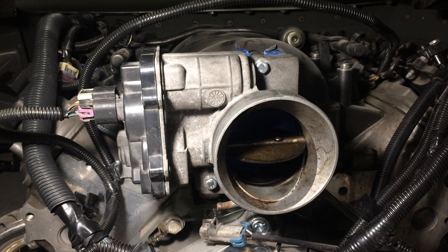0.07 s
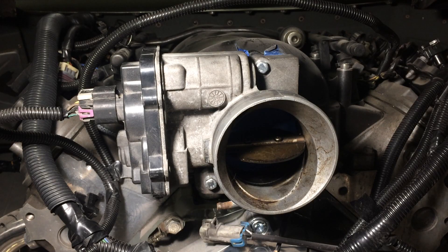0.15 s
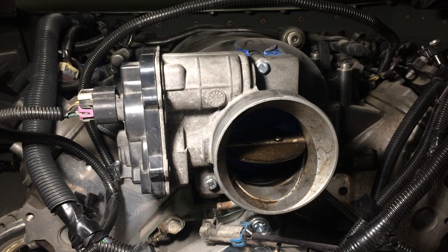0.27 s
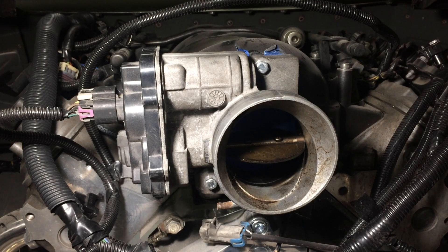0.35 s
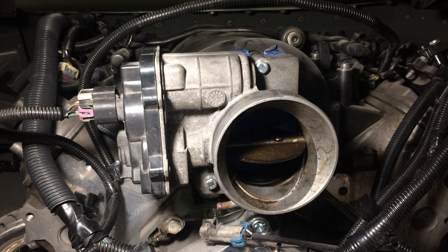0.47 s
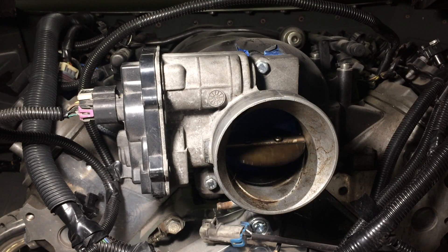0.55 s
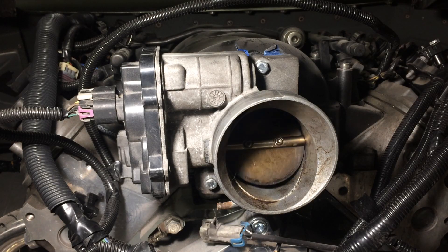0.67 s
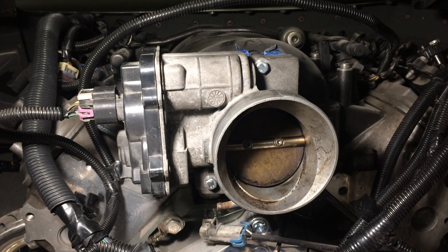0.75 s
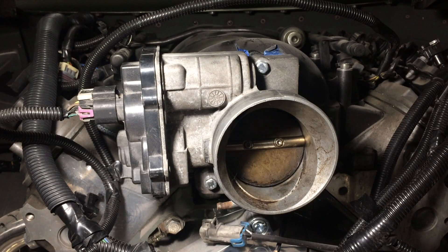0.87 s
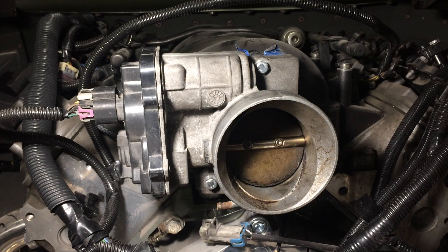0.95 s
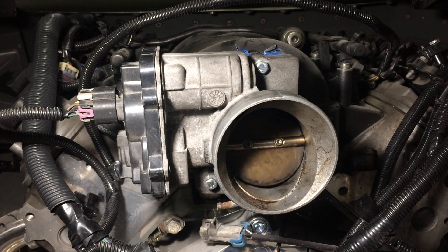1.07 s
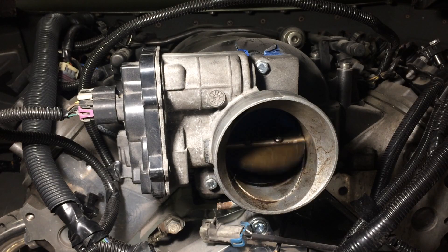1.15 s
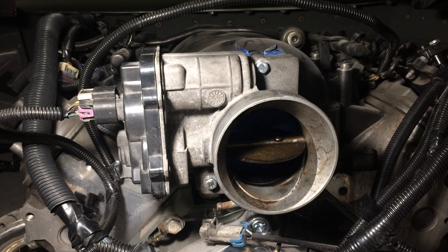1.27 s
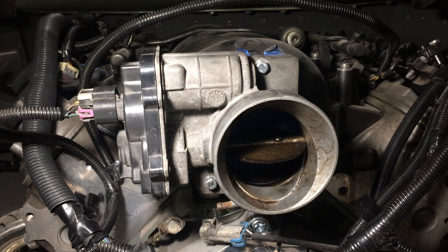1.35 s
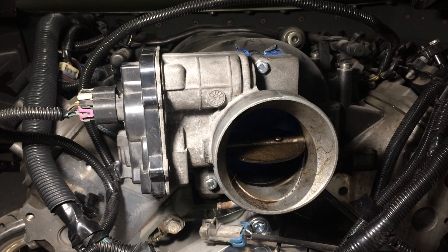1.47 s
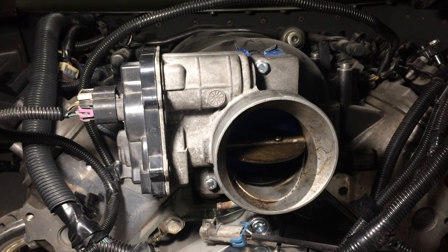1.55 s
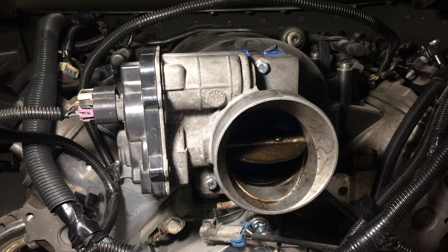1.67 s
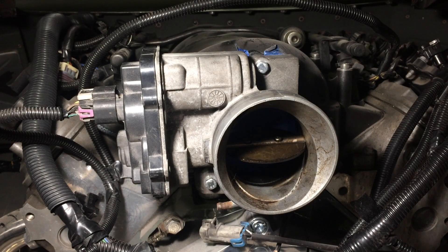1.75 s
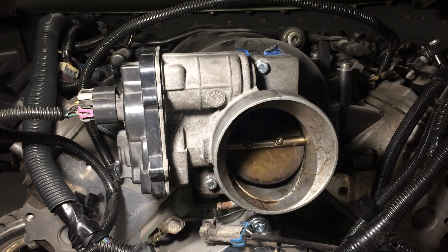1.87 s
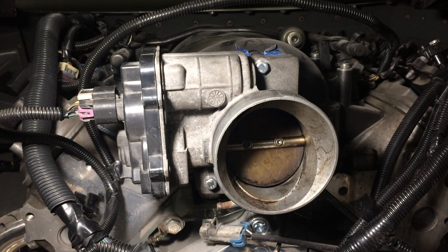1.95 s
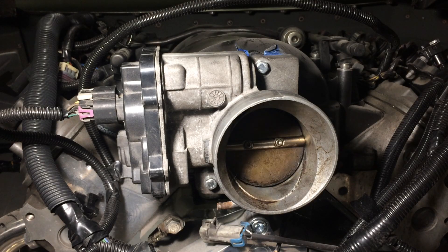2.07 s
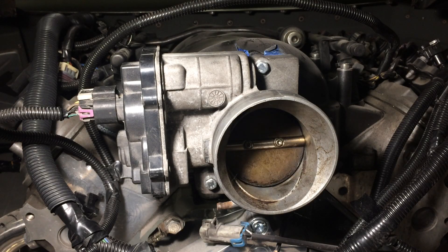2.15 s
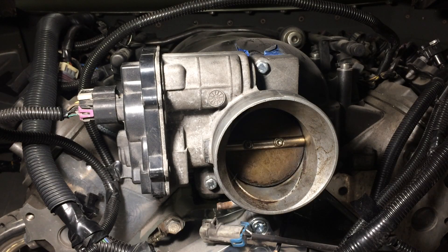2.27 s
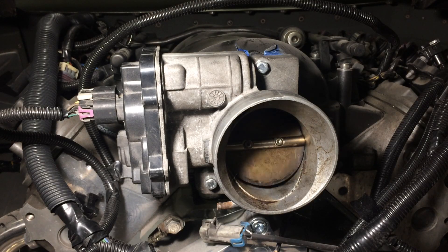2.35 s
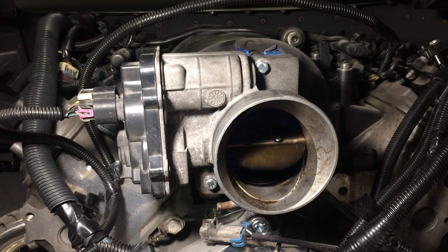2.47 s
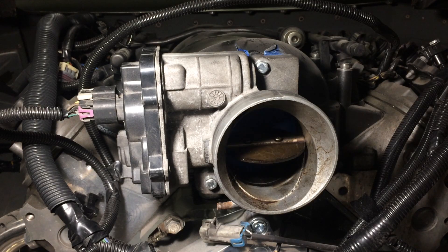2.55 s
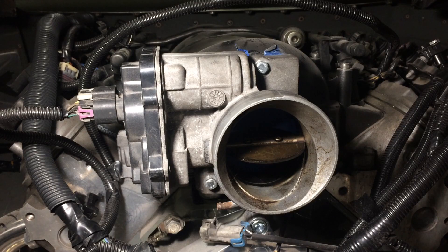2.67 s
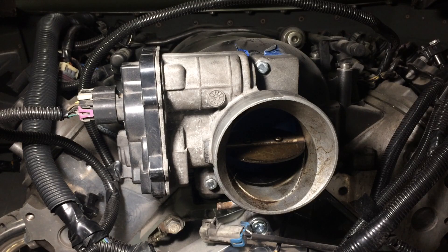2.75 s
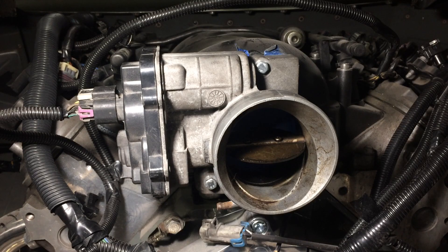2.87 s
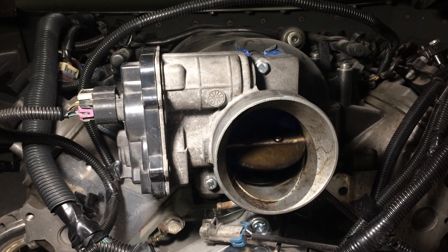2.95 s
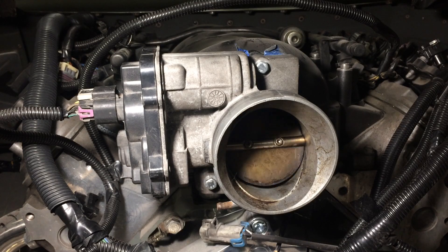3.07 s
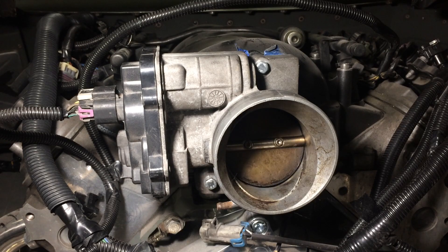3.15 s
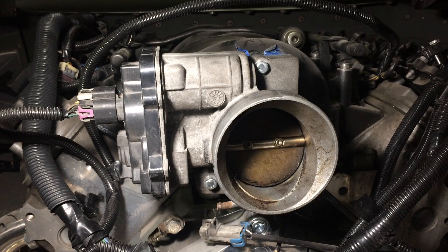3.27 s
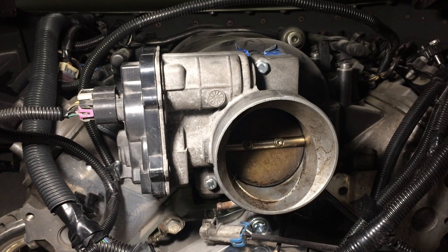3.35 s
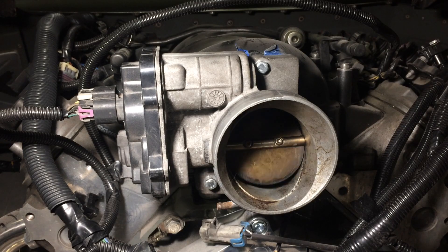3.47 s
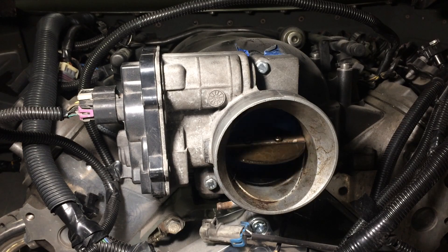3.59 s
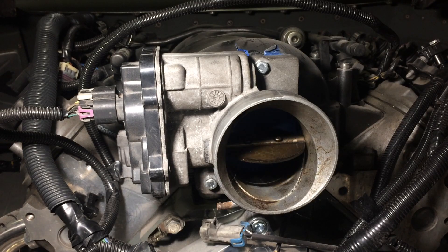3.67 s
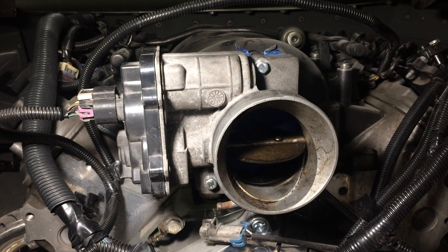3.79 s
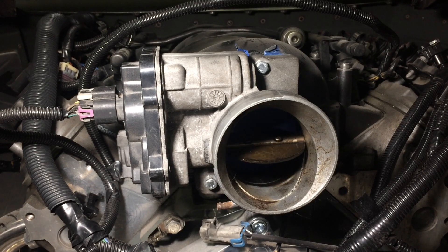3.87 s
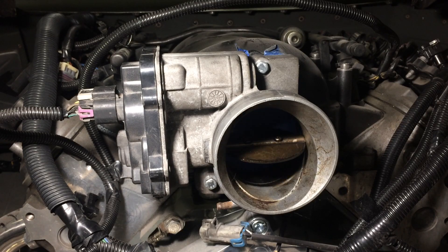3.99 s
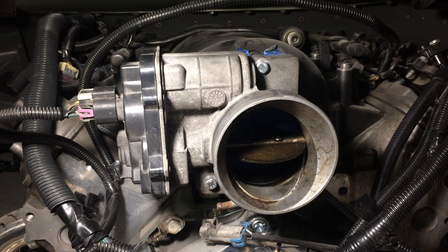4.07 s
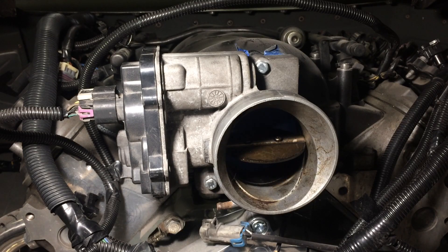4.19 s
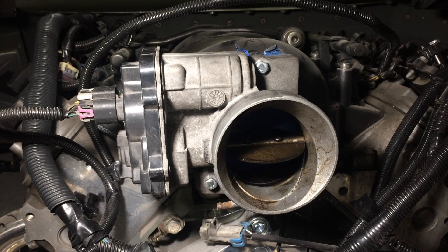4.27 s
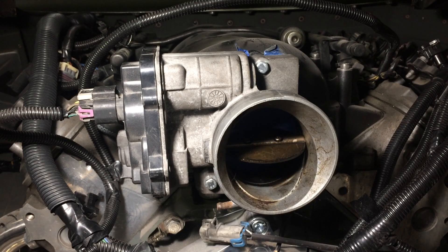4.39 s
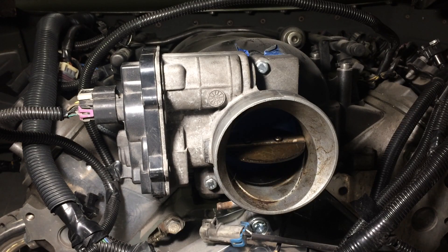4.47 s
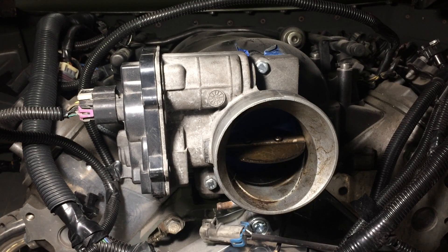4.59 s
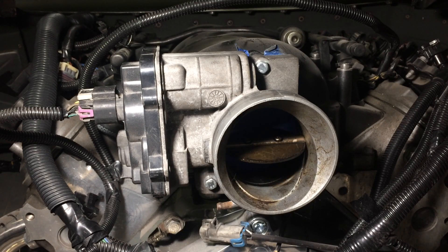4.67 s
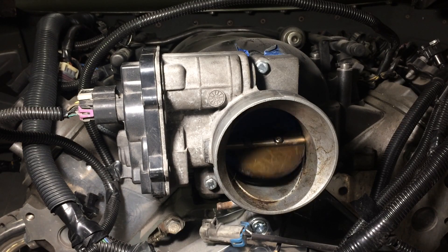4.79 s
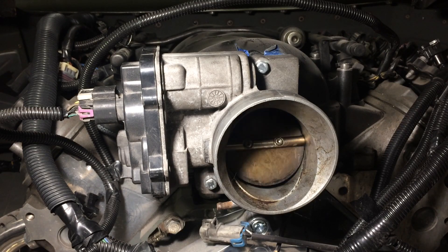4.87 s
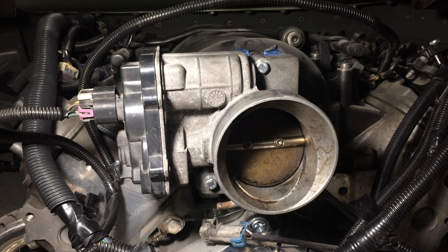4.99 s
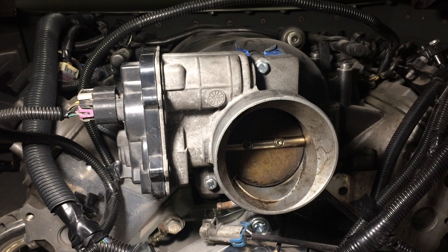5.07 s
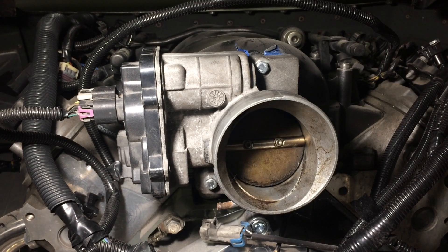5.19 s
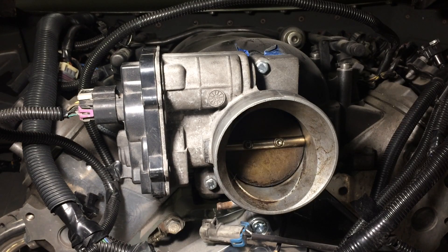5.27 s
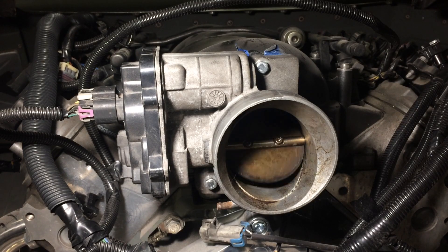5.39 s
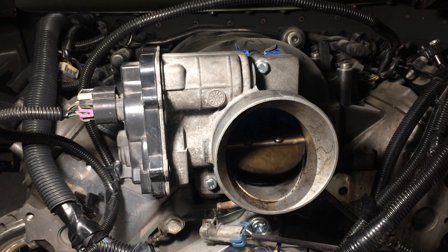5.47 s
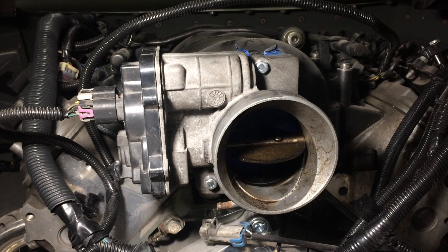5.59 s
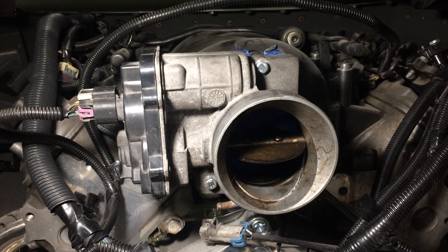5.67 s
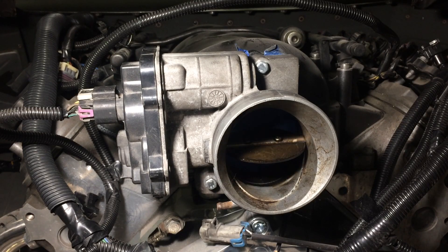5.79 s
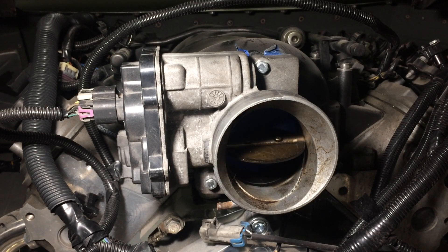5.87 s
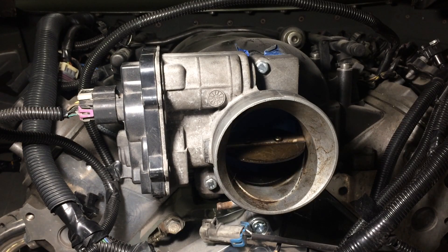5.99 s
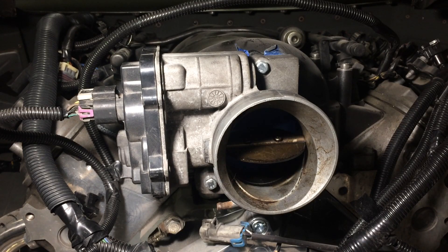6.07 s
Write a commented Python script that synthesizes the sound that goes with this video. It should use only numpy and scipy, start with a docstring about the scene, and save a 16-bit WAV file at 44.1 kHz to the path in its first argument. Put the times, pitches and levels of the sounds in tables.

```python
"""An electronic throttle body is worked open and shut on a stopped engine in a garage, close to a phone.
Its small motor ticks once per gear tooth, faster as it spins up; the looser gears rattle the aluminium
housing and the plate through banks of resonances, and a free gear wheel chatters at top speed.
The motor drive whines as a steady-pitched sine that swells and dips with the load.
The pedal booms and knocks softly in the cabin, and a fan hums in wavering lines over a rush of air."""
import sys
import numpy as np
from scipy import signal
from scipy.fft import rfft, irfft
from scipy.io import wavfile
from scipy.ndimage import uniform_filter1d

SR = 44100
rng = np.random.default_rng(int(sys.argv[2]) if len(sys.argv) > 2 else 0)


def inscribe(sig):
    """Save sig as 16-bit PCM at rate SR to the path in sys.argv[1].

    A 1-D sig is mono; a 2-D sig holds one channel per row.
    Samples are clipped to [-1, 1] before scaling.
    """
    pcm = np.round(np.clip(np.atleast_2d(sig).T, -1, 1) * 32767)
    wavfile.write(sys.argv[1], SR, pcm.astype(np.int16))


N = 270333
T = np.arange(N) / SR  # time [s]

# air noise in the garage: (frequency [Hz], relative level [dB])
AIR_SPECTRUM = [(22, -26), (45, -11.5), (70, -1.5), (95, -8.5), (125, -1.5), (185, 2.5), (235, -3),
                (290, -9.5), (500, -10), (800, -11), (1400, -14), (2600, -23), (3500, -23.5), (8500, -30.5),
                (11000, -62)]
# hum lines of the fan: (frequency [Hz], level [dB], depth of waver [ratio])
FAN_HUM = [(56, -66, .2), (80.5, -52, 0.17), (160.9, -45, 0.25), (215.8, -54, 0.65), (238.6, -63, 0.16),
           (457.5, -61.5, 0.58), (533, -62.5, 0.97), (1035, -65.5, 1), (1277, -66, 0.83), (1416, -62, 0.66)]
# the pedal meets its stops: (time [s], boom level [dB], relative knock level [dB], tick level [dB])
PEDAL_THUDS = [(1.493, -31, -38, -48), (2.078, -37, -42.5, -60), (3.982, -26.5, -38.5, -46),
               (5.066, -33, -41.5, -52), (6.069, -32, -39, -50)]
# the gears chatter in their slack at top speed: (mid time [s], length [s], level [dB])
CHATTER_BURSTS = [(0.708, 0.054, -42.5), (1.23, 0.017, -33), (1.258, 0.014, -20.5), (1.922, 0.031, -31.5),
                  (3.112, 0.02, -31.5), (4.912, 0.031, -31)]

# resonances of the free gear wheel on its first flank: (frequency [Hz], width [Hz], relative level [dB])
WHEEL_EARLY_MODES = [(1200, 75, -10), (1750, 240, -8), (5110, 110, -3.5), (5640, 120, -12)]
# resonances of the free gear wheel on its other flank: (frequency [Hz], width [Hz], relative level [dB])
WHEEL_LATE_MODES = [(1100, 71, -6), (1680, 40, -6), (4000, 150, -17), (4370, 170, 1), (4780, 160, 1)]
# resonances of the motor can: (frequency [Hz], width [Hz], relative level [dB])
MOTOR_MODES = [(5556, 77, -12), (5720, 85, -1.5), (5940, 95, 4), (6078, 103, 4), (6330, 140, -9.5),
               (6680, 61, -4), (6840, 120, -22), (8294, 62, -9.5), (9600, 200, -19), (10140, 61, -20.5),
               (15100, 340, -37)]
# resonances of the housing and gear cover: (frequency [Hz], width [Hz], relative level [dB])
HOUSING_MODES = [(518, 56, -12), (711, 89, -6), (1038, 94, 1), (1114, 89, 3), (1223, 48, 6),
                 (1318, 44, -1.5), (1530, 83, -4.5), (1690, 135, -4.5), (2378, 37, 1), (2650, 9.7, -7),
                 (2794, 32, -16), (3057, 27, -8), (3205, 76, -7.5), (3585, 65, -1), (3754, 25, -5),
                 (3910, 40, -11), (4420, 45, -20), (4530, 63, -5), (5150, 480, -22.5)]
# resonances of the plate on its shaft: (frequency [Hz], width [Hz], relative level [dB])
PLATE_MODES = [(1803, 72, -9), (1837, 102, -9.5), (1993, 57, 0.5), (2049, 76, -4), (2137, 52, -6)]
# resonances stirred by the return spring while closing: (frequency [Hz], width [Hz], relative level [dB])
SPRING_MODES = [(649, 75, 1), (757, 84, 4), (2700, 23, -8), (2940, 51, 2), (3450, 330, -3), (4260, 170, -1),
                (4350, 100, 0), (4760, 410, -5.5), (5750, 69, 1)]
# the dense small modes of the casting: (frequency [Hz], relative level [dB])
CASTING_SPECTRUM = [(350, -39), (700, -2), (1800, 3.5), (3000, 2.5), (4900, 6), (5600, 9.5), (6900, 8),
                    (7550, -5.5), (8100, 0), (10100, 0), (10900, -41), (12000, -19), (14000, -14),
                    (15600, -9)]

# the motor spins up, then brakes until it stalls: (start [s], spin-up length [s], top tooth rate [Hz],
# level [dB], spin-up curve [exponent], braking time constant [s], free-running half-length [s])
OPENING_MOVES = [(0.645, .072, 421, -4, 1.36, .1, 0.016), (1.877, .044, 422.7, -1.5, .8, 0.11, .011),
                 (3.018, .078, 422.5, -.5, 5, .1, 0.015), (4.861, 0.052, 414.9, -.5, 1.25, .102, 0.01)]
# motor and spring swing the plate back: (start [s], length [s], delay to top speed [s],
# delay to braking [s], top tooth rate [Hz], level [dB])
CLOSING_MOVES = [(0.004, 0.073, 0.032, 0.057, 145.6, -1.5), (1.174, 0.11, 0.054, 0.082, 548.8, -1.5),
                 (2.425, .206, 0.11, 0.14, 260, 0), (3.547, .176, .074, 0.1255, 315, -0.5),
                 (5.447, 0.22, 0.065, 0.16, 249.3, -0.5)]
# the gears take up their slack and bear hard:
# (time [s], half-length [s], motor gain [dB], gear gain [dB], plate gain [dB])
GEAR_SURGES = [(0.779, 0.056, 9.5, 8, 8.5), (1.204, 0.016, 2, 6.5, 1), (1.258, 0.0074, 14, 6, 12),
               (1.897, 0.0094, 6, 5.5, 3), (2.026, 0.015, 9.5, 5, 6.5), (3.128, 0.015, 5.5, 5, 6),
               (3.19, 0.013, 6, 0.5, 5.5), (3.615, 0.0069, 9, 2.5, 9), (4.962, 0.017, 7, 3, 9.5),
               (5.578, .008, 1, -0.5, 3.5)]
# faster teeth strike harder:
# (tooth rate [Hz], relative motor tick [dB], relative gear rattle [dB], relative plate ring [dB])
STRIKE_LAW = [(70.4, -59, -56, -59), (107, -42, -42.5, -47.5), (162, -32.5, -34.5, -35.5),
              (248, -27.5, -30.5, -31), (347, -23, -29, -25.5), (540, -14, -27.5, -21.5)]

# tooth rates [Hz]: as an opening begins, as it stalls, and at either end of a closing
START_HZ, STALL_HZ, CREEP_HZ = 115, 87.75, 72.1
SWING_SHAPE = .8  # exponent of the arch of speed while closing
INRUSH_DB, INRUSH_S = 4, .035  # the starting current drives the first ticks of an opening harder
# ticks and plate ring fade while the current reverses from driving to braking
FREE_TICK_DB, FREE_PLATE_DB = -25, -6.5
FREE_CLOSE_S = .006  # half-length of that reversal while closing
SPRING_LOAD_DB = 1  # the spring presses the gears together while closing
GRIP_DB, GRIP_HZ = 0.93, 129.6  # the teeth grip unevenly: spread and rate of change

# whine of the chopped motor current: pitch and level at rest
WHINE_HZ, WHINE_DB = 10043.3, -48
KICK_DB, KICK_S = 5.5, .018  # jump at top speed of an opening, and its half-length
HOLD_DB, HOLD_S = -7.5, 0.16  # dip while the plate is held open, and its half-length
HOLD_LAG_S = .09  # delay from top speed to that dip
CLOSE_DB, CLOSE_S = 4, 0.1  # swell while closing, and its half-length


def undb(db):
    """Decibels to gain."""
    return 10 ** (np.asarray(db) / 20)


def unit(x):
    """Scale to rms 1."""
    return x / np.sqrt(np.mean(x ** 2))


def bump(s, width):
    """A bell of height 1 around a moment."""
    return np.exp(-((T - s) / width) ** 2)


def walk(rate):
    """Smooth chance with about `rate` turns a second and a spread near 1."""
    k = int(SR / rate)
    held = rng.standard_normal(2000)[np.arange(N) // k]
    return 1.59 * uniform_filter1d(uniform_filter1d(held, k), k)


def colour(x, points):
    """Shape a sound by a spectrum of (frequency [Hz], level [dB]) points."""
    hz, db = np.transpose(points)
    f = np.maximum(np.fft.rfftfreq(len(x), 1 / SR), 1)
    gain = undb(np.interp(np.log(f), np.log(hz), db))
    return irfft(rfft(x) * gain, len(x))


def modes(table, size=6000):
    """Ring of a set of resonances after one tap, with energy 1; neighbours swing in opposite senses."""
    t = T[:size]
    ring = np.zeros(size)
    for k, (hz, width, db) in enumerate(table):
        decay = np.exp(-np.pi * width * t)
        ring += (-1) ** k * undb(db) * width * decay * np.sin(2 * np.pi * hz * t)
    return ring / np.linalg.norm(ring)


def tail(points, t60, size=30000):
    """Ring of countless modes: coloured noise that dies away, with energy 1."""
    noise = colour(rng.standard_normal(size), points)
    ring = noise * np.exp(-np.log(1000) * T[:size] / t60)
    return ring / np.linalg.norm(ring)


def through(x, ring):
    """Pass a drive through a ringing body."""
    return signal.fftconvolve(x, ring)[:N]


def contacts(turn, scatter_db, slop, scrape, scrape_decay):
    """One tap per tooth, uneven in force and timing, and a short scrape as flanks slide; mean power 1."""
    at = np.flatnonzero(np.diff(np.floor(turn)) > 0)
    step = turn[at + 1] - turn[at]  # teeth per sample
    late, force = rng.standard_normal((3000, 2))[:len(at)].T
    struck = np.clip(at + (slop * late / step).astype(int), 0, N - 1)
    taps = np.zeros(N)
    taps[struck] = undb(scatter_db * force) / np.sqrt(step)
    fade = np.exp(-(turn % 1) / scrape_decay) * np.sqrt(2 / scrape_decay)
    slide = rng.standard_normal(N) * fade
    return (taps + scrape * slide) / np.hypot(1, scrape)


def garage():
    """A fan hums with lines that waver in strength and phase, over an even rush of air."""
    air = unit(colour(rng.standard_normal(N), AIR_SPECTRUM)) * undb(-45.0 + .5 * walk(5.19))
    hum = np.zeros(N)
    for hz, db, waver in FAN_HUM:
        sway = 1 + waver * (walk(9) + 1j * walk(9))
        line = (sway * np.exp(2j * np.pi * hz * T)).real
        # the waver adds power, so divide it out
        hum += undb(db) * np.sqrt(2) * line / np.sqrt(1 + 2 * waver ** 2)
    return air + hum


def pedal(boom_hz=119, boom_t60=0.2, rise=0.0085):
    """Soft thuds boom as a dying sine in the cabin, with a dull knock and a faint tick of noise on top."""
    out = np.zeros(N)
    knock_spectrum = [(60, -7), (120, 8), (340, -4.0), (600, -11.5), (1500, -36), (4000, -51), (10000, -83)]
    tick_spectrum = [(500, -21), (1500, -13), (2000, 8.5), (2600, -14), (5800, -9), (8500, -23), (11000, -55)]
    knock = unit(colour(rng.standard_normal(N), knock_spectrum))
    tick = unit(colour(rng.standard_normal(N), tick_spectrum))
    for s, boom_db, knock_db, tick_db in PEDAL_THUDS:
        age = np.maximum(T - s, 0)
        boom_decay = np.exp(-np.log(1000) * age / boom_t60)
        boom = undb(boom_db) * np.sin(2 * np.pi * boom_hz * age) * boom_decay
        dull = undb(knock_db + 5.5) * knock * np.exp(-age / 0.04)
        faint = undb(tick_db) * tick * np.exp(-age / 0.052)
        out += (1 - np.exp(-age / rise)) * (boom + dull + faint)
    return out


def whine(ripple_db=1.1, ripple_hz=110):
    """The drive chops the motor current at a fixed rate; the tone follows the load and trembles with the servo."""
    db = WHINE_DB + ripple_db * walk(ripple_hz)
    for start, spin_s, *_ in OPENING_MOVES:
        top = start + spin_s
        db = db + KICK_DB * bump(top, KICK_S) + HOLD_DB * bump(top + HOLD_LAG_S, HOLD_S)
    for start, _, top_s, *_ in CLOSING_MOVES:
        db = db + CLOSE_DB * bump(start + top_s, CLOSE_S)
    return undb(db) * np.sin(2 * np.pi * WHINE_HZ * T)


def chatter(rate_hz=420):
    """Running free, a gear wheel chatters in its slack; its ring drops as it crosses to the other flank."""
    early, late = np.zeros((2, N))
    for s, length, db in CHATTER_BURSTS:
        progress = np.clip((T - s) / length + .5, 0, 1)
        swell = undb(db) * np.sqrt(4 * progress * (1 - progress))
        # equal-power crossfade from one flank to the other
        early += swell * np.sqrt(1 - progress)
        late += swell * np.sqrt(progress)
    taps = contacts(T * rate_hz, scatter_db=2, slop=.1, scrape=.5, scrape_decay=.4)
    return through(taps * early, modes(WHEEL_EARLY_MODES)) + through(taps * late, modes(WHEEL_LATE_MODES))


def motion():
    """Tooth rate [Hz], level [dB], free running and starting current (0-1), and when it opens and closes."""
    rate = np.full(N, float(CREEP_HZ))
    db, free, inrush, opening, closing = np.zeros((5, N))
    for start, spin_s, top_hz, level_db, curve, braking_s, free_s in OPENING_MOVES:
        stall = start + spin_s + braking_s * np.log(top_hz / STALL_HZ)
        on = (T >= start) & (T < stall)
        age = T[on] - start
        spin_up = START_HZ + (top_hz - START_HZ) * np.minimum(age / spin_s, 1) ** curve
        rate[on] = spin_up * np.exp(-np.maximum(age - spin_s, 0) / braking_s)
        db[on] = level_db
        inrush[on] = np.exp(-age / INRUSH_S)
        opening[on] = 1
        free += bump(start + spin_s, free_s)
    for start, length, top_s, brake_s, top_hz, level_db in CLOSING_MOVES:
        on = (T >= start) & (T < start + length)
        angle = np.interp(T[on] - start, [0, top_s, length], [0, np.pi / 2, 0])
        arch = np.sin(angle) ** SWING_SHAPE
        rate[on] = CREEP_HZ + (top_hz - CREEP_HZ) * arch
        db[on] = level_db
        closing[on] = 1
        free += bump(start + brake_s, FREE_CLOSE_S)
    return rate, db, free, inrush, opening, closing


def forces(rate, db, free, inrush, closing):
    """Drive in dB of ticks, rattle and plate ring: set by speed, current and spring, raised by surges."""
    law_hz, *laws = np.transpose(STRIKE_LAW)
    levels = np.array([db + np.interp(np.log(rate), np.log(law_hz), law) for law in laws])
    for s, length, *gains_db in GEAR_SURGES:
        levels += np.outer(gains_db, bump(s, length))
    tick_db, gear_db, plate_db = levels + GRIP_DB * walk(GRIP_HZ)
    return (tick_db + FREE_TICK_DB * free + INRUSH_DB * inrush,
            gear_db + SPRING_LOAD_DB * closing,
            plate_db + FREE_PLATE_DB * free)


def throttle(closing_db=3, speed_db=5):
    """The motor ticks in step with its speed; the looser gears shake housing and plate."""
    rate, db, free, inrush, opening, closing = motion()
    tick_db, gear_db, plate_db = forces(rate, db, free, inrush, closing)
    moving = opening + closing > 0
    # each move starts half a tooth before its first contact
    turn = np.cumsum(rate) / SR
    turn = turn - np.maximum.accumulate(turn * ~moving) + .5
    motor_teeth = contacts(turn, scatter_db=1.5, slop=.025, scrape=.25, scrape_decay=.1)
    ticks = moving * undb(tick_db) * motor_teeth
    teeth = moving * contacts(turn, scatter_db=2.8, slop=.1, scrape=.55, scrape_decay=.3)
    gears = teeth * undb(gear_db)
    motor = undb(-3.5) * through(ticks, modes(MOTOR_MODES))
    housing = undb(-6.0) * through(gears, modes(HOUSING_MODES))
    plate = undb(-1.5) * through(teeth * undb(plate_db), modes(PLATE_MODES))
    spring = undb(-8.5) * through(gears * closing, modes(SPRING_MODES))
    # faster teeth strike harder, and more so with the spring behind them
    hardness = undb(closing_db * closing + speed_db * np.log2(np.maximum(rate / 300, 1)))
    shake = hardness * (undb(-14) * gears + undb(-15) * ticks)
    casting = through(shake, tail(CASTING_SPECTRUM, t60=0.051))
    return motor + housing + plate + spring + casting


def scene():
    """The throttle close by, its faint echo from engine bay and walls, and the room."""
    near = throttle() + chatter()
    echo_spectrum = [(300, -38), (2000, -2.5), (6000, -7), (14000, -18.0)]
    echo = through(near, tail(echo_spectrum, t60=0.29))
    return (near + undb(-20) * echo + whine() + pedal() + garage())[None]


def record(dry):
    """The phone cuts the top: a steep low-pass at 15.8 kHz."""
    low_pass = signal.ellip(10, .2, 80, 15800, fs=SR, output="sos")
    return signal.sosfilt(low_pass, dry)


dry = scene()
out = record(dry)
inscribe(out)
```